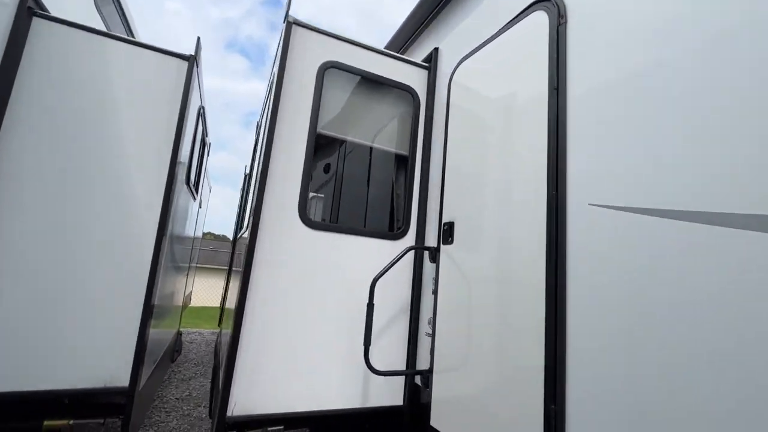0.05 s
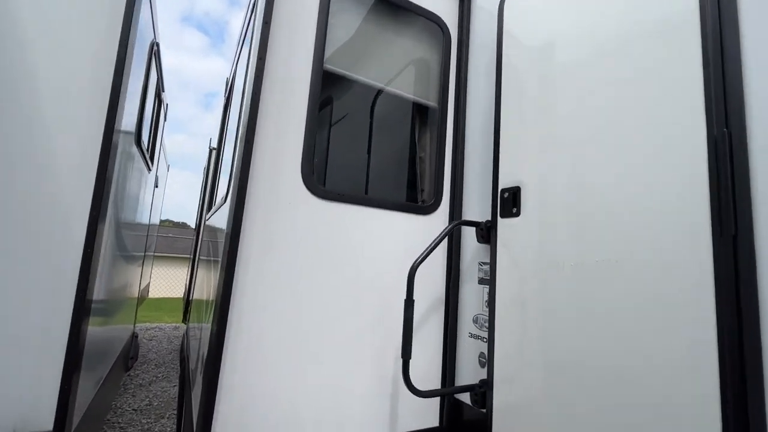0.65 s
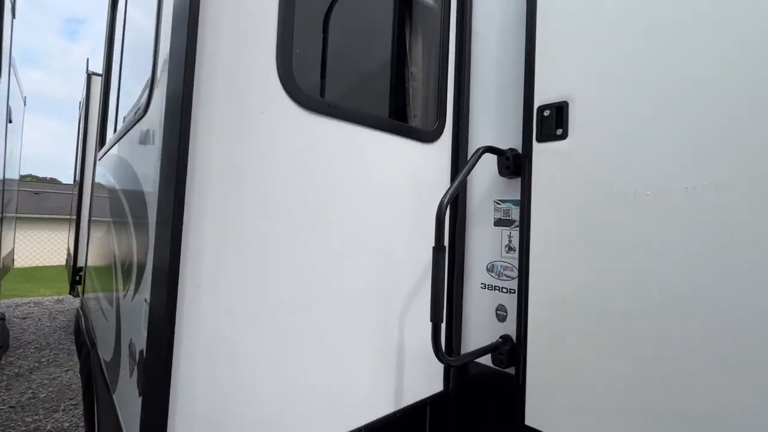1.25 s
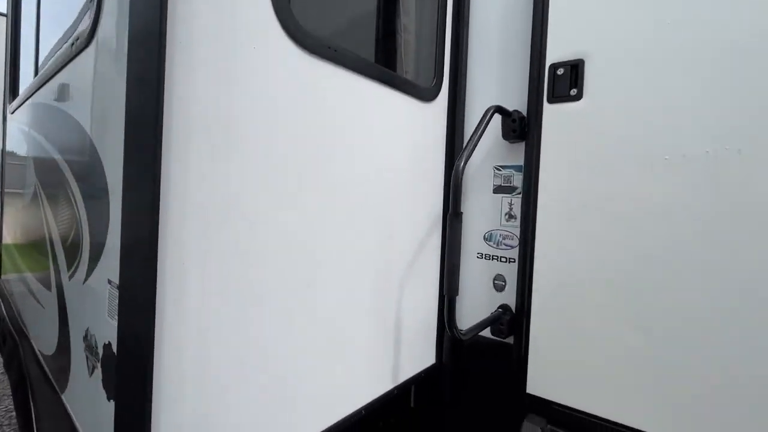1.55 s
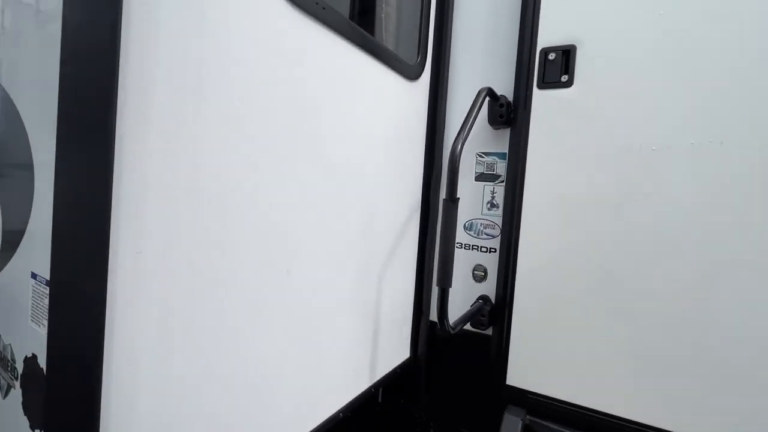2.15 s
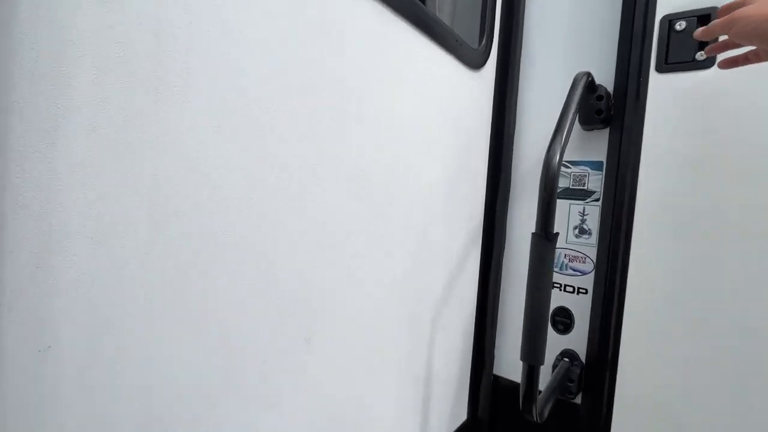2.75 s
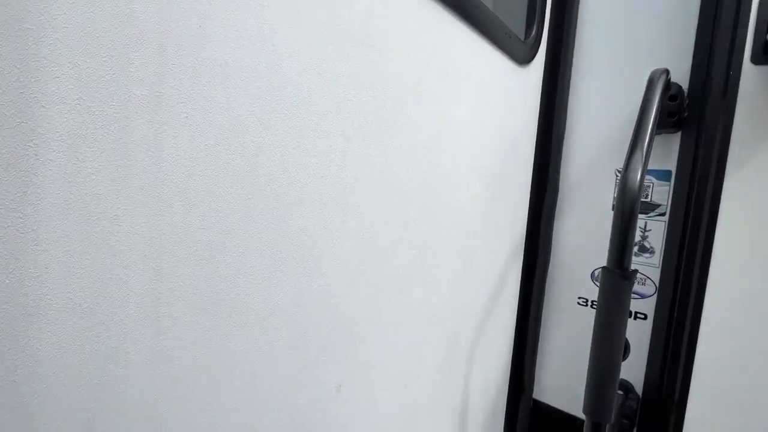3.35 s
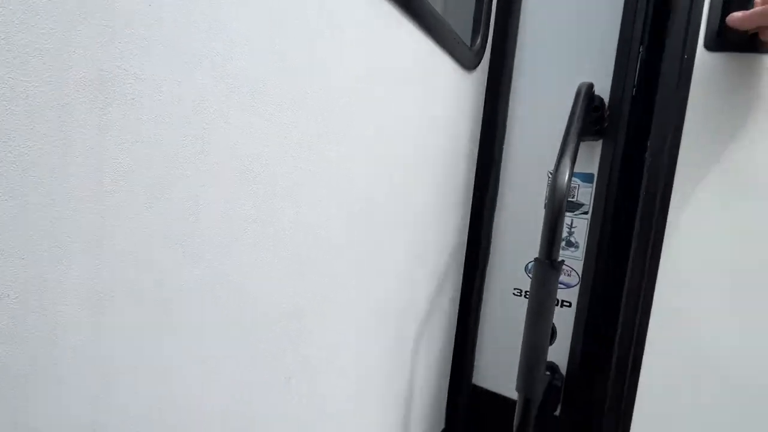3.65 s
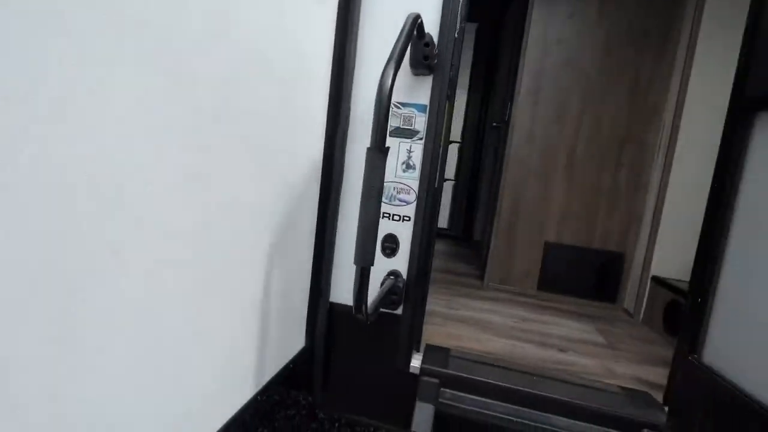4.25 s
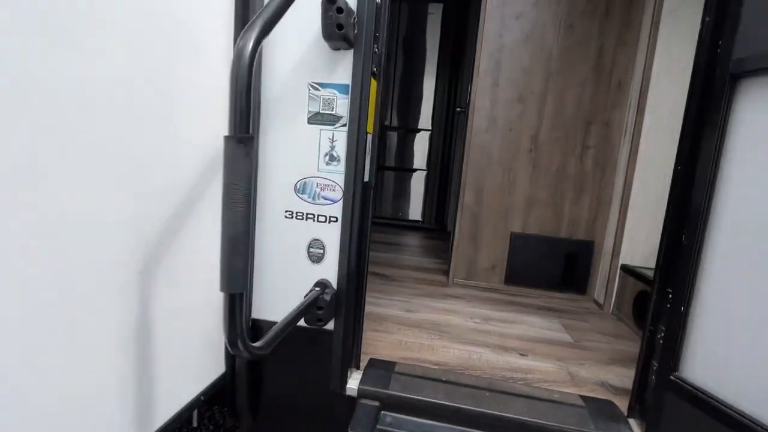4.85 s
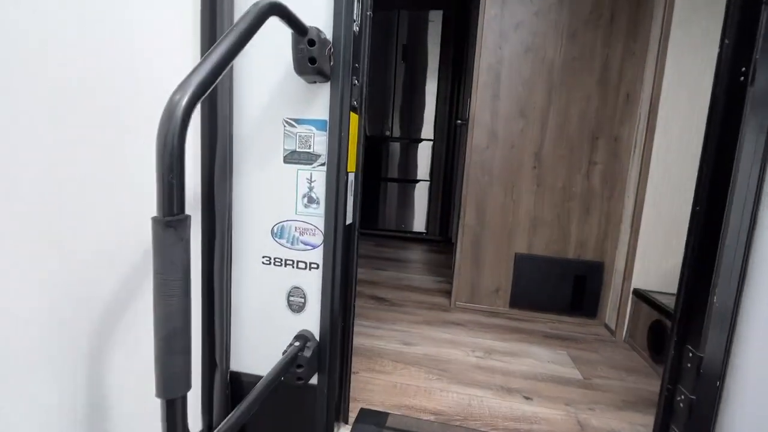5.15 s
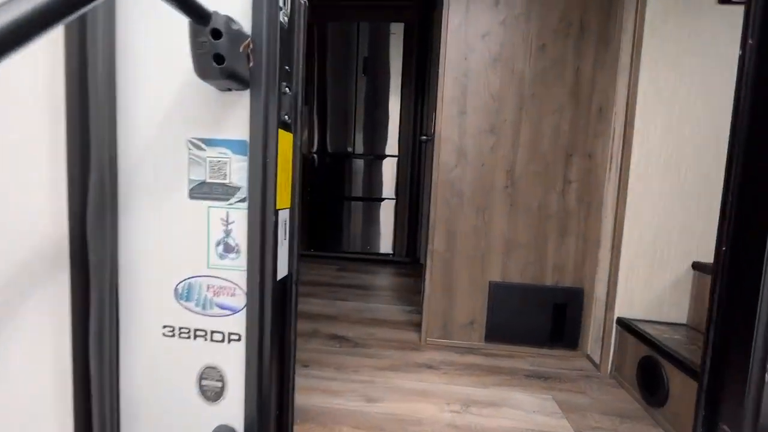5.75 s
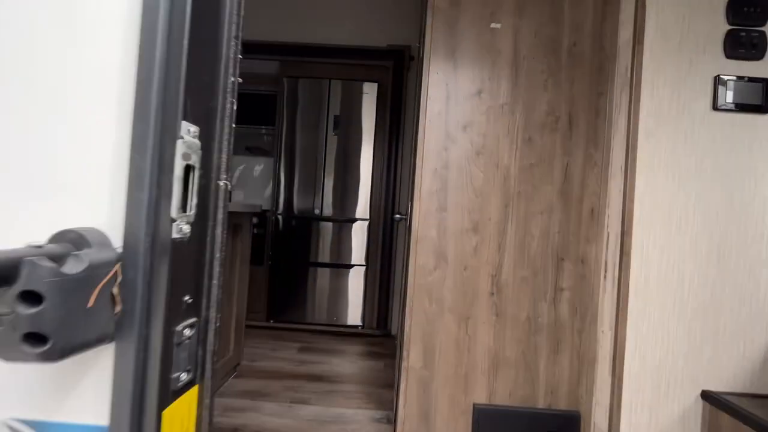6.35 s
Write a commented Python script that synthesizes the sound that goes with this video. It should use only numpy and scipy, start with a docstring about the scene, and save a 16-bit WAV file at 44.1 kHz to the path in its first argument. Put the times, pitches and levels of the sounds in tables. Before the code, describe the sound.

A steady outdoor hiss with a low rumble swells in during the first second and stays behind everything. Close to the microphone, footsteps crunch and drag over gravel until about 1.5 seconds, with small stones knocking. Near 2 seconds a shoe lands on a metal step with a sharp clack and a scuff. From about 2.9 to 3.5 seconds a trailer door latch clicks lightly and loose fittings rattle over soft thuds. At 4 seconds the bolt snaps free, the loudest moment: the frame rings briefly and the door panel booms. Around 4.5 seconds shoes knock on the fold-out metal steps with hollow thuds, followed by small hardware clicks until 5 seconds. A heavy step and a rasping scuff come at 5.6 seconds, a softer thud at 6, and another knock with scraping soles near 6.4 seconds.

```python
"""Outdoors, close to a hand-held phone with two microphone ports. A steady hiss swells in as someone
crosses gravel, stones grinding under the soles. At a trailer, about three seconds in, the door latch
clicks and loose fittings rattle. A second later the bolt snaps free: the frame rings, the panel booms.
Then shoes knock and scuff up the fold-out metal steps, and the hollow body thuds under the weight."""
import sys
import numpy as np
from scipy import signal
from scipy.fft import rfft, irfft, next_fast_len
from scipy.io import wavfile
from scipy.ndimage import uniform_filter1d

SR = 44100
rng = np.random.default_rng(int(sys.argv[2]) if len(sys.argv) > 2 else 0)


def bounce(signal):
    """Save signal as a 16-bit WAV file at the path given by the first command-line argument."""
    frames = np.transpose(np.atleast_2d(signal))
    limited = np.clip(frames, -1, 1)
    pcm = np.round(limited * 32767).astype(np.int16)
    wavfile.write(sys.argv[1], SR, pcm)


N = 291179
TIME = np.arange(N) / SR
AGE = TIME[:SR * 3 // 4]  # seconds since the start of one event
MODE_LAG_S, MODE_LAG_SPREAD_S = 0.000396, 0.00035  # how late a surface's modes reach the left port


def undb(db):
    return 10 ** (np.asarray(db) / 20)


def unit(x):
    """Scale to rms 1."""
    return x / np.sqrt(np.mean(x ** 2))


def unit_hit(x):
    """Scale to rms 1 over the first 10 ms."""
    return x / np.sqrt(np.mean(x[..., :SR // 100] ** 2))


def read(points, hz):
    """Look up (Hz, value) points on a log-frequency axis."""
    f, value = np.transpose(points)
    return np.interp(np.log(hz + 1), np.log(f), value)


def colour(x, points):
    """Causal filter with a (Hz, dB) spectrum, falling away outside it."""
    n = 2 * next_fast_len(x.shape[-1] // 2 + 2048)
    hz = np.arange(n // 2 + 1) * SR / n + 1
    octaves_outside = np.log2(np.maximum(1, np.maximum(points[0][0] / hz, hz / points[-1][0])))
    cepstrum = irfft(np.log(undb(read(points, hz) - np.minimum(24 * octaves_outside, 50))))
    cepstrum[1:n // 2] *= 2  # fold to minimum phase
    cepstrum[n // 2 + 1:] = 0
    return irfft(rfft(x, n) * np.exp(rfft(cepstrum)))[..., :x.shape[-1]]


def band(x, lo_hz, hi_hz, order=2):
    """Band-pass filter."""
    return signal.sosfilt(signal.butter(order, [lo_hz, hi_hz], "band", fs=SR, output="sos"), x)


def port_noise(n, alike_hz=1300, lag_s=0, bass_alike=0.11):
    """Noise at both ports, correlated by bass_alike below alike_hz and 0.3 above; the left lags."""
    hz = np.fft.rfftfreq(n, 1 / SR)
    shared, own = rfft(rng.standard_normal((2, n)))
    alike = .3 + (bass_alike - .3) / (1 + (hz / alike_hz) ** 4)
    left = shared * np.exp(-2j * np.pi * hz * lag_s)
    right = alike * shared + np.sqrt(1 - alike ** 2) * own
    return irfft(np.array([left, right]), n)


def wander(rate_hz, n=N):
    """Smooth random drift with rms 1."""
    hold = int(SR / rate_hz)
    stairs = np.repeat(rng.standard_normal(n // hold + 1), hold)
    return unit(uniform_filter1d(stairs, hold)[:n])


def fade(t60):
    """Exponential decay, 60 dB down after t60 seconds."""
    return np.exp(-np.log(1000) * AGE / t60)


def press(length, attack_s, t60):
    """Envelope of a load: attack, hold, and a release that runs down to silence."""
    release = np.maximum(AGE - length, 0)
    taper = np.cos(np.pi / 2 * release / max(release[-1], .01))
    return np.minimum(AGE / attack_s, 1) * np.exp(-np.log(1000) * release / t60) * taper


def burst(t60, tail_db, tail_t60):
    """Countless close modes: noise with a quick decay and a longer tail."""
    return port_noise(len(AGE)) * (fade(t60) + undb(tail_db) * fade(tail_t60))


def strike(t60, tail_db, tail_t60, contact_db):
    """A hard contact: one spike, then the burst that it sets off."""
    spike = np.zeros((2, len(AGE)))
    spike[:, 0] = 1
    return undb(contact_db) * unit_hit(spike) + unit_hit(burst(t60, tail_db, tail_t60))


def ring(modes, rise_s, scatter=0., spread=1):
    """Damped modes (Hz, dB, t60), detuned by scatter; on a wide surface each has its own lag."""
    detune, place = rng.standard_normal((2, len(modes)))
    lags = spread * (MODE_LAG_S + MODE_LAG_SPREAD_S * place)
    waves = np.zeros((2, len(AGE)))
    for (hz, db, t60), tuning, lag in zip(modes, 1 + scatter * detune, lags):
        waves += undb(db) * fade(t60) * np.sin(2 * np.pi * hz * tuning * np.array([AGE - lag, AGE]))
    return waves * (1 - np.exp(-AGE / rise_s))


def grains(spectrum, spread_db):
    """A spray of tiny grains of unequal size, 40 samples each."""
    sizes = np.repeat(np.minimum(rng.exponential(size=len(AGE)), 4), 40)[:len(AGE)]
    return unit(colour(port_noise(len(AGE)) * undb(spread_db * sizes), spectrum))


def add(out, start, sound):
    """Mix a sound in at start seconds."""
    i = int(start * SR)
    out[:, i:i + sound.shape[1]] += sound[:, :N - i]


# The trailer wall, never two metres from the microphone. Each row: time in seconds, distance in metres.
WALL_DISTANCE = [(0, 1.78), (1.5, 0.99), (3, 0.61), (4, 0.69), (4.8, 1), (6.6, 0.25)]

def off_wall(x, echo_db=-20.5):
    """The flat side of the trailer sends back an echo that combs the sound as the distance changes."""
    delay_s = 2 * np.interp(TIME, *np.transpose(WALL_DISTANCE)) / 343
    return x + undb(echo_db) * np.array([np.interp(TIME - delay_s, TIME, port) for port in x])


# Colour of the hiss before it opens. Each row: frequency in Hz, gain in dB.
HISS_CLOSED = [(100, -4.5), (350, -1.5), (500, -17.5), (850, -9), (1100, -45), (1850, -28), (2400, 2),
               (12000, -7)]

def opening(x, open_s=0.19, s_per_octave=0.18, rise_s=0.095, dip_db=-1.5):
    """In the first second the middle of the hiss swells in, high notes first: a downward whoosh."""
    hz, t, spectrum = signal.stft(x[:, :SR], SR, nperseg=1024)
    octaves_down = np.log2(2000 / np.clip(hz, 500, 2500))[:, None]
    since = (t - open_s - s_per_octave * octaves_down) / rise_s
    middle = ((hz > 600) & (hz < 2200))[:, None]
    db = read(HISS_CLOSED, hz)[:, None] * np.clip(-since, 0, 1) + dip_db * middle * np.exp(-since ** 2)
    first_second = signal.istft(spectrum * undb(db), SR)[1][:, :SR]
    return np.hstack([first_second, x[:, SR:]])


# The open air, far behind everything. Each row: frequency in Hz, level in dB.
HISS_SPECTRUM = [(25, -29), (42, -3), (62, 6), (110, -0.5), (165, -5.5), (240, -3), (480, -13), (700, -13),
                 (1100, -14.5), (1650, -14.5), (2400, -28.5), (4500, -35), (7000, -44.5), (12500, -39),
                 (14200, -50), (15000, -70)]
# Slow swells in its middle and its treble. Each row: time in seconds, gain in dB.
HISS_MIDDLE = [(1.2, 3.5), (2.5, 3), (4.4, 4.5), (4.85, 3), (5.3, 3), (5.8, 4.5)]
HISS_TREBLE = [(1.35, -2.5), (1.65, 0.5), (1.8, -9.5), (2.15, 4.5), (2.7, 3), (2.95, -5.5), (3.45, -0.5),
               (3.6, -9.5), (3.78, -7), (3.86, 10.5), (4.1, 1), (5.05, -2), (5.5, 3), (6.6, 1.5)]

def outdoors(level_db=-40.5, far_db=-2.5, arrival_s=2.47):
    """Distant rumble and hiss from the right, growing towards the trailer; each register wavers."""
    n = next_fast_len(N)
    hz = np.fft.rfftfreq(n, 1 / SR)
    noise = port_noise(n, alike_hz=940, lag_s=0.000855, bass_alike=0.97)[:, :N]
    spectrum = rfft(off_wall(noise), n) * undb(read(HISS_SPECTRUM, hz))
    below = [0] + [1 / (1 + (hz / edge_hz) ** 8) for edge_hz in (420, 1050, 2000, 5000)] + [1]
    registers = [irfft(spectrum * (upper - lower), n)[:, :N] for lower, upper in zip(below, below[1:])]
    middle_db = np.interp(TIME, *np.transpose(HISS_MIDDLE))
    treble_db = np.interp(TIME, *np.transpose(HISS_TREBLE))
    gains_db = -1, middle_db, middle_db, treble_db / 2, treble_db
    wavers_db = 2, 1.7, 1.7, 1.7, 1.7
    air = sum(register * undb(db + waver_db * wander(6.4))
              for register, db, waver_db in zip(registers, gains_db, wavers_db))
    nearing_db = np.interp(TIME, [arrival_s / 2, arrival_s], [far_db, 0])
    return undb(level_db + nearing_db) * opening(air) / np.std(sum(registers))


# Gravel dragged underfoot. Each row: starting frequency in Hz, width in Hz, level in dB.
SWISH_RESONANCES = [(2480, 720, 1.5), (4060, 550, -6)]

def swish(start_s=.62, peak_s=1.0, end_s=1.35, level_db=-52, octaves_per_s=-0.36):
    """A dragging sole: noise in two resonances that glide down as it slows."""
    out = np.zeros((2, N))
    glide = np.cumsum(2 ** (octaves_per_s * AGE)) / SR
    push = np.interp(start_s + AGE, [start_s, peak_s, end_s], [0, 1, 0])
    for hz, width, db in SWISH_RESONANCES:
        flutter = unit(band(port_noise(len(AGE)), 3.9, width / 2))
        add(out, start_s, undb(level_db + db) * push * unit(flutter * np.sin(2 * np.pi * hz * glide)))
    return out


# A bit of grit or hardware. Each row: multiple of the pitch, level in dB, t60 in seconds.
PING_MODES = [(1, 0, .014), (1.09, -3, .011), (.91, -4, .012), (.8, -6, .009), (1.22, -8, .008)]

def ping(hz):
    """A small hard part rings briefly at its own pitch."""
    modes = [(hz * multiple, db, t60) for multiple, db, t60 in PING_MODES]
    return unit_hit(ring(modes, 0.00038, scatter=0.014, spread=0))


# Stones grinding together, from dull to bright. Each row: frequency in Hz, level in dB.
CRUNCH_SPECTRUM = [(400, -17), (740, -3.5), (1200, 2), (1600, -5), (2300, -20)]
RUSTLE_SPECTRUM = [(1550, -29), (1800, -21), (2020, -1), (2250, -6.5), (2750, 0), (3360, -0.5),
                   (3750, -4.5), (4150, -2), (4700, -8), (6000, -9), (7500, -14.5)]
FIZZ_SPECTRUM = [(4000, -4.5), (6300, -5), (8000, -7.5), (10500, 0.5), (13000, -2.5), (15000, -14)]
# Soles on the gravel below the microphone. Each row: start and length in seconds,
# crunch, rustle and fizz levels in dB, t60 in seconds.
GRAVEL_STEPS = [(0.01, 0.12, -84, -52, -59, .54), (0.258, 0.05, -70, -59, -50, .3),
                (.345, .14, -65, -60, -54, .25), (0.584, 0.12, -46, -52, -55, .4),
                (.625, .036, -46, -47, -46, .05), (0.741, 0.4, -53, -55, -70, .6),
                (1.158, 0.07, -38, -49, -58, .45), (1.32, .04, -52, -59, -70, .6)]
# Stones giving way. Each row: start in seconds, grain level in dB, t60 in seconds, knock level in dB.
LOOSE_STONES = [(0.6407, -49, 0.097, -47), (0.7006, -38, .1, -48), (0.7445, -44, 0.12, -49),
                (1.0085, -40, 0.045, -35.5), (1.1476, -40, 0.04, -42.5), (1.1708, -47, 0.051, -45),
                (1.239, -34, 0.13, -35.5), (1.2763, -38.5, 0.039, -32)]
# The knock of one stone. Each row: frequency in Hz, level in dB, t60 in seconds.
STONE_MODES = [(1228, 8, 0.026), (884, 0, 0.0092), (1560, -22, .01)]
# Sharp grit underfoot. Each row: start in seconds, tick and ping levels in dB, ping pitch in Hz.
GRIT_TICKS = [(0.032, -53, -57, 4500), (0.086, -58, -63, 3170), (0.22, -67, -62, 4500),
              (.254, -64, -64, 9000), (0.277, -54, -53, 11900), (0.347, -52, -63, 3520),
              (.381, -57, -59.5, 9150), (0.4105, -52, -50, 10930), (0.456, -42.5, -42.5, 12550),
              (0.477, -54, -53, 10300), (.492, -53, -55, 4160), (.57, -58, -59, 12800),
              (.593, -45.5, -54, 4230), (.605, -54, -53, 5600), (0.621, -50, -59, 6440),
              (0.632, -44, -55, 11500), (0.644, -52, -46, 12300), (0.655, -54, -52, 5200),
              (.665, -56, -54, 12200), (.761, -49.5, -58, 3000), (.773, -58, -47.5, 1900)]

def gravel():
    """Each step grinds the stones into a spray of grains; single stones knock, and grit pings on top."""
    out = np.zeros((2, N))
    layers = (CRUNCH_SPECTRUM, 3.5), (RUSTLE_SPECTRUM, 3.5), (FIZZ_SPECTRUM, 3)
    for start, length, *levels, t60 in GRAVEL_STEPS:
        load = press(length, attack_s=0.021, t60=t60)
        for db, (spectrum, spread_db) in zip(levels, layers):
            add(out, start, undb(db) * load * grains(spectrum, spread_db))
    for start, db, t60, knock_db in LOOSE_STONES:
        crunch = unit_hit(fade(t60) * grains(CRUNCH_SPECTRUM, spread_db=3.5))
        edges = unit_hit(fade(t60) * grains(RUSTLE_SPECTRUM, spread_db=3.5))
        knock = unit_hit(ring(STONE_MODES, 0.00014, scatter=0.034, spread=0))
        add(out, start, undb(db) * (crunch + undb(-24) * edges) + undb(knock_db) * knock)
    for start, db, ping_db, hz in GRIT_TICKS:
        tick = unit_hit(colour(strike(.009, -14, .09, contact_db=-17.5), FIZZ_SPECTRUM))
        add(out, start, undb(db) * tick + undb(ping_db) * ping(hz))
    return out


# Dull taps close by, at the door and steps. Each row: start in seconds, level in dB, pitch in Hz.
SMALL_TAPS = [(3.068, -39.5, 1300), (3.189, -54, 1160), (3.278, -43.5, 1070), (3.378, -41.5, 1190),
              (3.909, -41, 1380), (4.003, -44.5, 1410), (4.214, -40.5, 1240), (4.273, -40, 1270),
              (5.414, -42, 1150), (6.09, -44, 1450)]

def taps():
    """Small hard contacts ring for an instant only."""
    out = np.zeros((2, N))
    for start, db, hz in SMALL_TAPS:
        modes = [(hz, 0, .022), (hz * 1.26, -6, .016), (hz * .85, -9, .016)]
        add(out, start, undb(db) * unit_hit(ring(modes, 0.00033, spread=0)))
    return out


# The surface under a sliding sole. Each row: multiple of the pitch, level in dB.
GROAN_PARTIALS = [(1, 3.5), (1.17, -5.5), (1.5, -8.5), (2.801, -10.5)]

def groan(hz, jitter=.045, flutter_db=3.5):
    """Stick and slip keep a few resonances singing, unsteady in pitch and strength."""
    n = len(AGE)
    pitch = hz * (1 + jitter * wander(56.6, n))
    turns = np.cumsum(pitch) / SR - hz * np.array([[MODE_LAG_S], [0]])
    return unit(sum(undb(db + flutter_db * wander(46.7, n)) * np.sin(2 * np.pi * multiple * turns)
                    for multiple, db in GROAN_PARTIALS))


# A rasping sole and the sand under it. Each row: frequency in Hz, level in dB.
RASP_SPECTRUM = [(350, -64), (600, -3.5), (903, 1), (1110, 0), (1680, -9), (1940, -6), (2240, -14),
                 (3300, -16.5), (4220, -22.5), (6870, -31), (11600, -53), (14000, -49)]
SAND_SPECTRUM = [(2000, -19), (2700, -1), (3400, 2), (4400, 2), (5400, -9), (8000, -18), (13000, -18)]
# Soles sliding and taking weight below the microphone. Each row: start and main push length in seconds,
# groan level in dB, groan pitch in Hz, rasp and sand levels in dB.
SOLE_SCUFFS = [(0.039, 0.02, -35.5, 377, -74, -70), (0.636, 0.047, -38, 315, -39.5, -58),
               (1.159, 0.04, -35.5, 345, -42, -50), (1.962, 0.049, -39.5, 338, -32, -53),
               (3.844, 0.042, -46.5, 387, -34.5, -68), (5.64, 0.069, -29, 336, -36, -41.5),
               (5.716, 0.058, -30, 322.2, -33, -50), (6.093, 0.23, -48, 342, -44, -59),
               (6.441, 0.091, -39, 356, -34.5, -51), (6.554, 0.14, -39, 383, -37.5, -53)]

def scuffs(slip_spread_db=4):
    """A sole sticks and slips: the slips rasp, sand scrapes, and the surface beneath groans."""
    out = np.zeros((2, N))
    for start, length, groan_db, hz, rasp_db, sand_db in SOLE_SCUFFS:
        push = np.interp(AGE / length, [0, .15, .75, 1.25], [0.25, 0.57, 0.46, 0.1])
        push *= press(2.8 * length, 0.0093, 1.0)
        slips = port_noise(len(AGE)) * undb(slip_spread_db * np.tanh(wander(163.3, len(AGE))))
        rasp = undb(rasp_db) * unit(colour(slips, RASP_SPECTRUM))
        sand = undb(sand_db) * grains(SAND_SPECTRUM, spread_db=2.5)
        surface = undb(groan_db) * press(length, 0.0069, 1.0) * groan(hz)
        add(out, start, push * (rasp + sand + surface))
    return out


# Door hardware at arm's length. Each row: start in seconds, latch, fittings and tick levels in dB,
# latch t60 in seconds, ping level in dB, ping pitch in Hz.
LATCH_CLICKS = [(2.856, -59, -61, -67, .04, -60, 3860), (2.976, -68, -70, -64, .04, -58, 11400),
                (2.998, -56, -58, -68, .03, -53, 6100), (3.006, -62, -66, -62, .02, -58, 9000),
                (3.058, -49, -56, -58, 0.1, -54, 5000), (3.1882, -34, -47, -53.5, 0.035, -42, 3360),
                (3.213, -54, -62, -62, .02, -58, 3900), (3.277, -50, -52, -72, 0.035, -57, 4300),
                (3.308, -54, -61, -65, 0.03, -54, 7600), (3.316, -53, -61, -57, .025, -56, 7400),
                (3.3758, -42, -50, -54, 0.027, -46, 3120), (3.386, -44, -46, -55, 0.05, -54, 4100),
                (3.481, -49, -56, -55, 0.035, -49, 4040), (3.504, -49, -53, -58, 0.03, -51, 3620),
                (4.4231, -44, -57, -44, 0.044, -47, 11800), (4.4284, -35, -51, -42, 0.031, -42, 3300),
                (4.476, -48, -48, -49, 0.11, -50, 11100), (4.509, -36, -44, -39.5, 0.1, -42, 11600),
                (4.5835, -46, -51, -56, 0.12, -58, 4300), (4.803, -43, -56, -62, .043, -49, 2300),
                (4.9035, -37, -41, -60, .06, -38, 1100), (4.909, -43, -40, -64, 0.1, -43, 720)]
# The body of the latch. Each row: frequency in Hz, level in dB.
LATCH_SPECTRUM = [(500, -10.5), (640, -14), (860, 7), (1070, -12), (1430, 6), (1720, -8.5), (2030, 1),
                  (2400, -1.5), (3100, -5.5), (4700, -15), (6000, -30)]
# The loose fittings. Each row: frequency in Hz, level in dB, t60 in seconds.
FITTING_MODES = [(694, -2, .1), (1066, -1, .12), (1394, -6, .06), (1997, 0, .1), (2580, -11, .08),
                 (2815, -13, .09), (3822, -14, .08), (4735, -17, .06)]

def latch():
    """Metal strikes metal: the latch clicks and shakes the loose fittings."""
    out = np.zeros((2, N))
    for start, body_db, ring_db, tick_db, t60, ping_db, hz in LATCH_CLICKS:
        body = unit_hit(colour(strike(t60, -13.5, 0.69, contact_db=-26), LATCH_SPECTRUM))
        fittings = unit_hit(ring(FITTING_MODES, 0.00047, scatter=0.0026))
        tick = unit_hit(band(strike(t60 * 0.79, -15, 0.24, contact_db=-18), 5500, 13900))
        click = undb(body_db) * body + undb(ring_db) * fittings + undb(tick_db) * tick
        add(out, start, click + undb(ping_db) * ping(hz))
    return out


# The door jolting free, under a metre away. Each row: start in seconds, jolt and snap levels in dB.
DOOR_JOLTS = [(4.0375, -17, -15.5), (4.04, -19, -19), (4.0472, -26, -45)]
# The sliding bolt, the jolted door and its hollow leaf. Each row: frequency in Hz, level in dB.
BOLT_SPECTRUM = [(700, -24), (1500, 7.5), (3000, 0.5), (5000, -8), (7000, -23), (13000, -25)]
DOOR_SPECTRUM = [(260, -16), (400, -11), (560, -29), (730, -6.5), (900, -12), (1400, 1.5), (2000, -2),
                 (2450, -1), (3100, -3.5), (3950, -9.5), (4750, -13), (5250, -16), (6500, -18), (8200, -24),
                 (9600, -12), (10350, 2), (11000, -20), (12200, -13), (13200, -11), (14500, -41)]
LEAF_SPECTRUM = [(170, -1.5), (280, 0), (400, -5), (560, -15), (780, -3.5), (1000, -10)]
# The snapping steel latch, the frame, the thin steel striker and the booming panel.
# Each row: frequency in Hz, level in dB, t60 in seconds.
SNAP_MODES = [(1680, 0, .05), (2440, -1, 0.045), (3470, -3, .035), (4500, -3, .025), (4720, 5, 0.025),
              (5640, -3, 0.03), (6230, -2, 0.03), (6900, -2, 0.022), (10300, 3, .03)]
FRAME_MODES = [(287, 4, .3), (361, -2, .4), (389, -2, .4), (756, -3, .25), (1138, 6, .15), (1264, 8, .17),
               (1355, 4, .16), (1415, 3, .14), (1537, 3, .14), (1685, 3, .17), (1735, 3, .15),
               (1803, 6, .16), (1890, 3, .14), (2024, 4, .12), (2182, 3, .14), (2317, 6, .15),
               (2478, 9, .15), (2557, 2, .15), (2654, 2, .14), (2854, 1, .15), (2930, 3, .17),
               (3150, 5, .16), (3267, 4, .15), (3533, 2, .13), (4166, -6, .13), (4570, -7, .15),
               (4736, 3, .1), (5700, -8, .15), (6320, -5, .12), (6880, -9, .13)]
STRIKER_MODES = [(10250, -6, .08), (10312, 0, .19), (10365, -5, .1), (10540, -12, .16), (11810, -9, .13),
                 (12100, -10, .11), (13020, -14, .12)]
PANEL_MODES = [(142, -10.5, 0.25), (214, -7.5, 0.07)]

def door(slide_s=.012, swing_lag_s=.012):
    """The bolt slides and snaps free, frame and striker ring, and the panel booms as it swings out."""
    out = np.zeros((2, N))
    free_s = DOOR_JOLTS[0][0]
    force = (AGE / slide_s) ** 2 * (AGE < slide_s)
    add(out, free_s - slide_s, undb(-18) * force * grains(BOLT_SPECTRUM, spread_db=2.6))
    for start, db, snap_db in DOOR_JOLTS:
        jolt = unit_hit(colour(burst(0.01, -9.5, 0.19), DOOR_SPECTRUM))
        snap = unit_hit(ring(SNAP_MODES, 0.0005, scatter=0.0052))
        add(out, start, undb(db) * jolt + undb(snap_db) * snap)
    frame = undb(-21) * unit_hit(ring(FRAME_MODES, 0.0027))
    striker = undb(-30.5) * unit_hit(ring(STRIKER_MODES, 0.00086))
    add(out, free_s, frame + striker)
    boom = ring(PANEL_MODES, 0.0057)
    rumble = undb(-22) * unit_hit(band(burst(0.19, -8.5, 0.95), 72, 190, order=1))
    thump = undb(-24) * unit_hit(colour(burst(.12, -20, .3), LEAF_SPECTRUM))
    add(out, free_s + swing_lag_s, boom + rumble + thump)
    return out


# Weight coming down on the trailer floor. Each row: start in seconds, level in dB, pitch in Hz.
FLOOR_THUDS = [(3.068, -23, 289), (3.101, -25, 179), (3.31, -24.5, 272), (3.4, -25, 172),
               (4.46, -15.5, 89.6), (4.462, -11.5, 156), (4.524, -12.5, 142), (4.525, -16, 99.7),
               (4.57, -17.5, 117), (5.602, -9.5, 236), (5.612, -25.5, 79.7), (6.001, -20, 86),
               (6.375, -26, 91.5), (6.421, -14, 215), (6.462, -32, 92.4)]
# Weight shifting. Each row: start and length in seconds, level in dB, pitch in Hz.
BODY_STRAINS = [(2.039, 0.051, -42.5, 221), (3.021, 0.087, -35, 93), (3.18, 0.37, -39.5, 114),
                (5.626, 0.095, -38, 190), (5.785, 0.118, -37, 75), (6.031, 0.24, -42, 95),
                (6.445, 0.16, -35.5, 93)]

def trailer_body(thud_cycles=15.3):
    """The hollow body answers a sudden load with a soft thud, and shifting weight with a shudder."""
    out = np.zeros((2, N))
    for start, db, hz in FLOOR_THUDS:
        t60 = thud_cycles / hz  # low thuds last longest
        rumble = unit_hit(band(burst(t60, -16, 0.78), hz / 2, hz * 2, order=1))
        thud = ring([(hz, 0, t60)], rise_s=0.0051)
        add(out, start, undb(db) * (thud + undb(-26) * rumble))
    for start, length, db, hz in BODY_STRAINS:
        shudder = unit(band(port_noise(len(AGE), bass_alike=0.82), hz / 1.92, hz * 1.43))
        add(out, start, undb(db) * press(length, attack_s=0.0075, t60=0.29) * shudder)
    return out


# Shoes on the metal steps, just below the microphone. Each row: start in seconds,
# boom, clack, crack and grit levels in dB, clang pitch in Hz, clack t60 in seconds.
SHOE_KNOCKS = [(1.941, -27.5, -24, -25, -55.5, 1386, 0.15), (4.4484, -29, -28.5, -40, -57, 1173, 0.16),
               (4.514, -29.5, -30, -48.5, -58.5, 1264, 0.15), (5.6003, -21.5, -27.5, -31, -60, 1110, 0.13),
               (6.419, -24, -24, -47, -55, 1190, 0.053)]
# The hollow ring of a tread. Each row: frequency in Hz, level in dB, t60 in seconds.
TREAD_MODES = [(188.7, 1.5, 0.41), (225.6, 0.5, 0.18), (264.6, 13.5, 0.049), (322, -6, 0.45),
               (395.5, -11.5, 0.8), (485, -20, 0.5), (537, -9.5, 0.3), (703, -1.5, 0.089), (808, -6, .25),
               (999, -4, 0.21)]
# The tread's clack, and a heel cracking on its edge. Each row: frequency in Hz, level in dB.
CLACK_SPECTRUM = [(150, -12), (250, -5.5), (451, -27), (586, -13.5), (865, -7.5), (1010, -8), (1200, -2),
                  (1310, -4.5), (1450, -7), (1640, -21.5), (1950, -14), (2130, -23), (5000, -34),
                  (6500, -50), (11000, -120)]
CRACK_SPECTRUM = [(1500, 4.5), (2050, -0.5), (2700, -9), (4000, -15), (6000, -36)]

def treads(boom_lag_s=0.0012):
    """A shoe lands: the heel cracks, the tread clacks, grit crackles, and a hollow boom follows."""
    out = np.zeros((2, N))
    for start, boom_db, clack_db, crack_db, grit_db, hz, t60 in SHOE_KNOCKS:
        boom = unit_hit(ring(TREAD_MODES, 0.0016, scatter=0.019))
        rumble = unit_hit(band(burst(0.055, 7.7, 0.85), 63, 610))
        clack = unit_hit(colour(strike(t60, -11.0, 0.19, contact_db=-12), CLACK_SPECTRUM))
        clang = unit_hit(ring([(hz, 0, .055), (hz * 0.84, -3, .07), (hz * 1.36, -7, .03)], 0.00058))
        crack = unit_hit(colour(strike(.012, -17, .18, contact_db=3), CRACK_SPECTRUM))
        grit = unit_hit(band(burst(0.044, 2, 0.37), 3600, 14000))
        metal = undb(clack_db) * (clack + undb(-7) * clang)
        add(out, start, metal + undb(crack_db) * crack + undb(grit_db) * grit)
        add(out, start + boom_lag_s, undb(boom_db) * (boom + undb(-18.5) * rumble))
    return out


def from_right(x, lag_s=.00016):
    """A source to the right of the phone reaches the left port late."""
    return np.array([np.interp(TIME - lag_s, TIME, x[0]), x[1]])


# Close sounds at the two microphone ports. Each row: frequency in Hz, left minus right in dB.
PORT_BALANCE_DB = [(70, -4.5), (140, 0), (280, -6.5), (550, -8), (1200, 7.5), (2500, -2.5), (5000, 2.5),
                   (9000, -4), (14000, 1)]

def scene():
    """Close sounds take a different colour at each port; the outdoor hiss lies behind them."""
    trailer = treads() + trailer_body() + from_right(latch() + door())
    near = trailer + off_wall(gravel()) + swish() + taps() + scuffs()
    n = next_fast_len(N + len(AGE))
    balance_db = read(PORT_BALANCE_DB, np.fft.rfftfreq(n, 1 / SR))
    port_gains = undb(np.array([balance_db, -balance_db]) / 2)
    return irfft(rfft(near, n) * port_gains, n)[:, :N] + outdoors()


def record(dry):
    """The phone rounds the highest peaks and cuts the top above 15.2 kHz."""
    return signal.sosfilt(signal.ellip(8, .2, 80, 15200, fs=SR, output="sos"), np.tanh(dry))


dry = scene()
out = record(dry)
bounce(out)
```